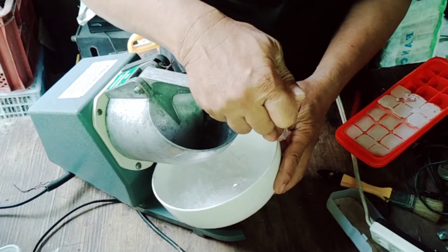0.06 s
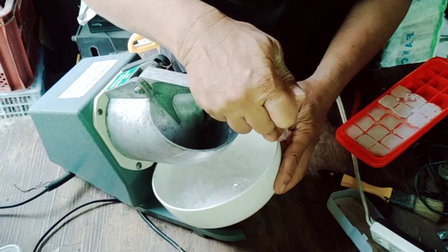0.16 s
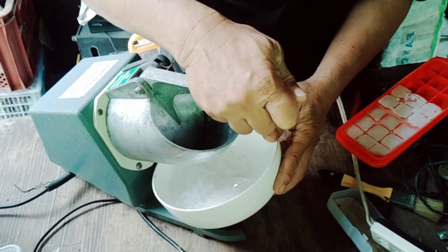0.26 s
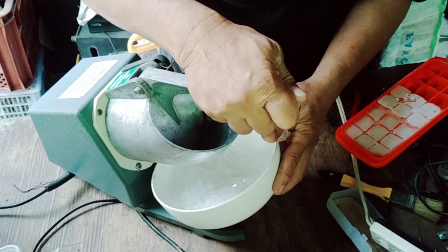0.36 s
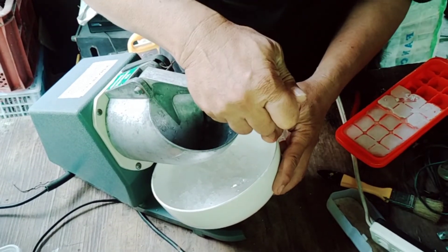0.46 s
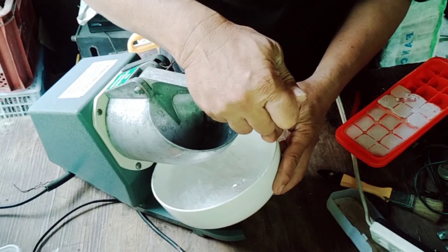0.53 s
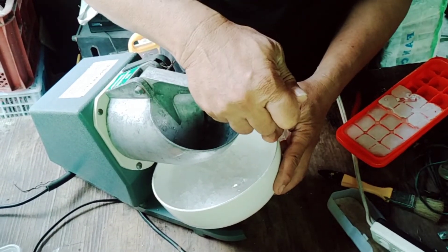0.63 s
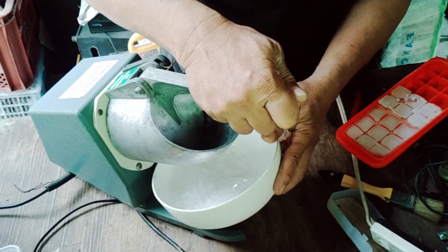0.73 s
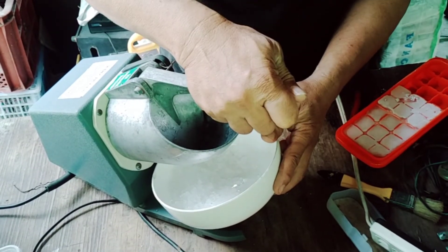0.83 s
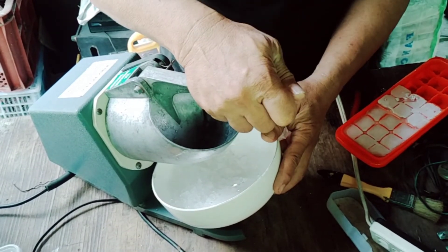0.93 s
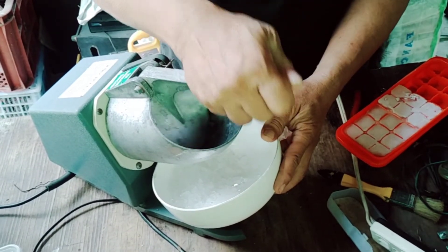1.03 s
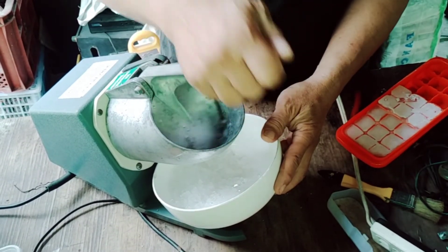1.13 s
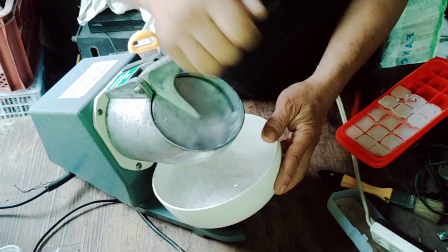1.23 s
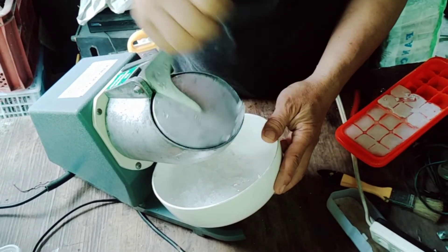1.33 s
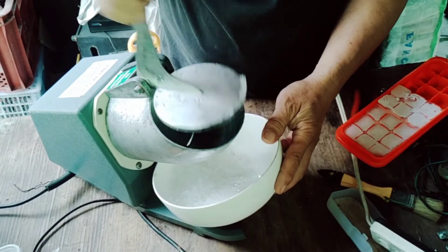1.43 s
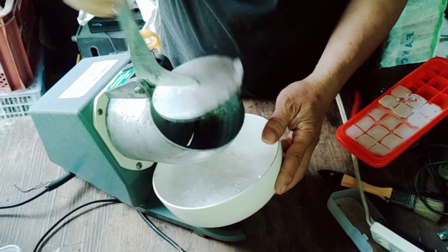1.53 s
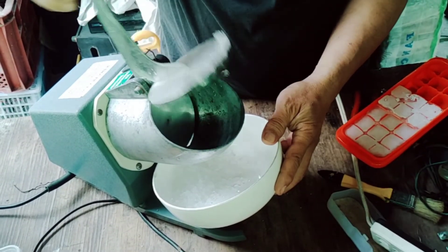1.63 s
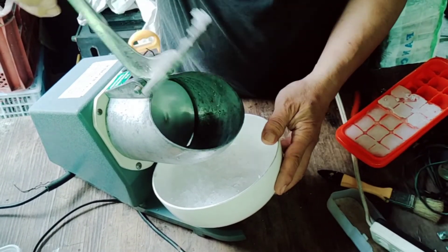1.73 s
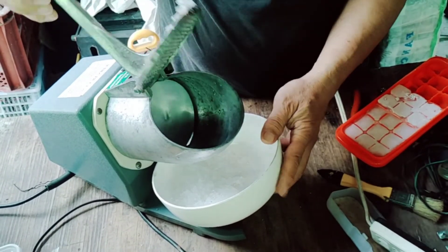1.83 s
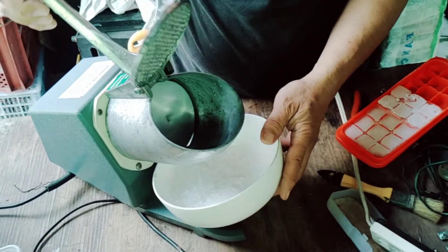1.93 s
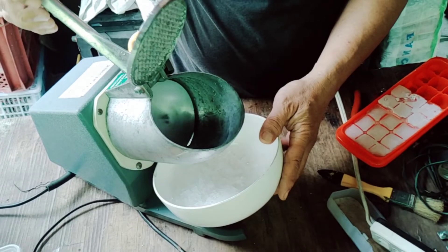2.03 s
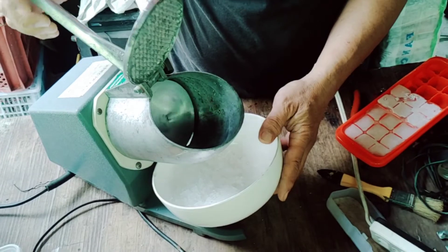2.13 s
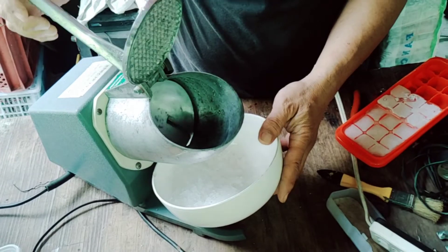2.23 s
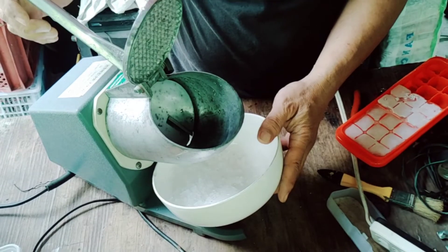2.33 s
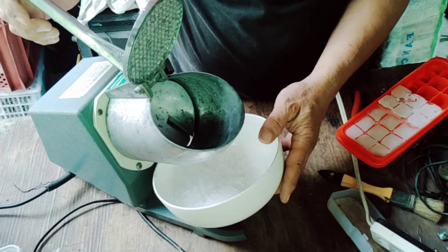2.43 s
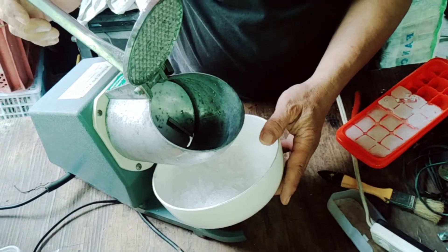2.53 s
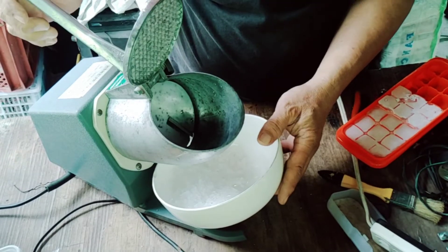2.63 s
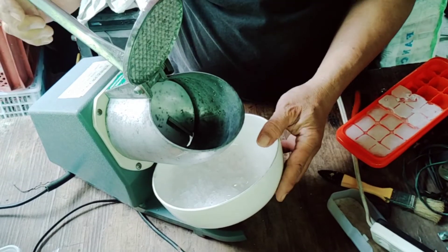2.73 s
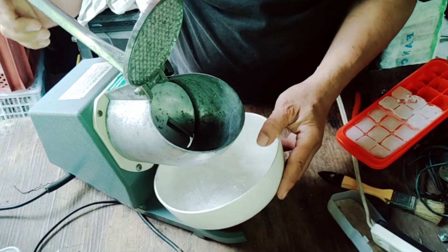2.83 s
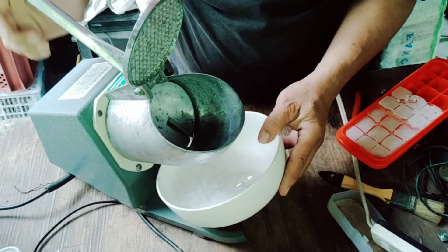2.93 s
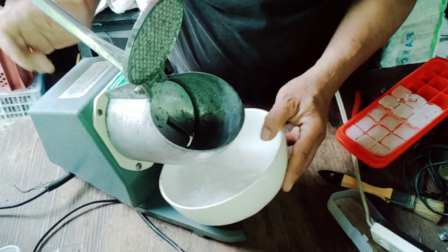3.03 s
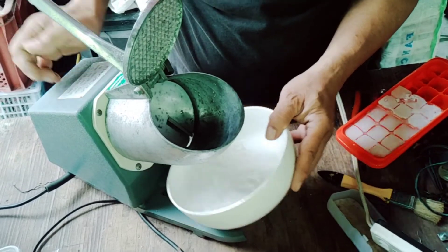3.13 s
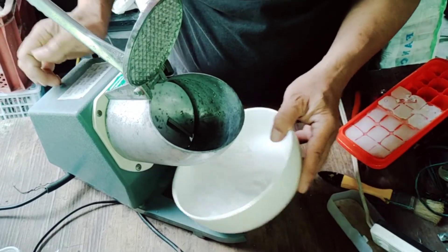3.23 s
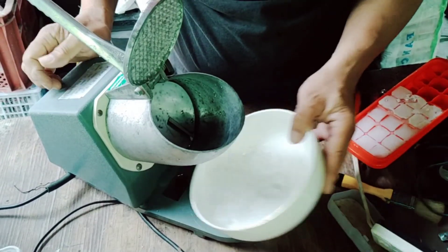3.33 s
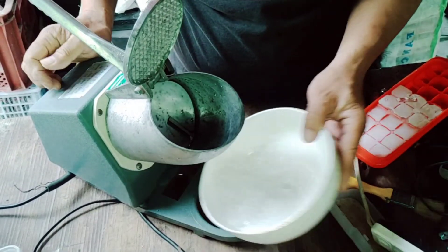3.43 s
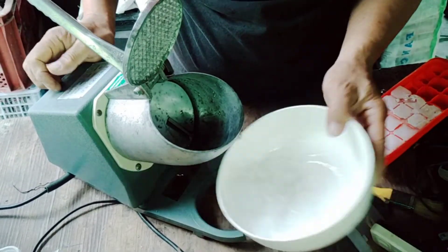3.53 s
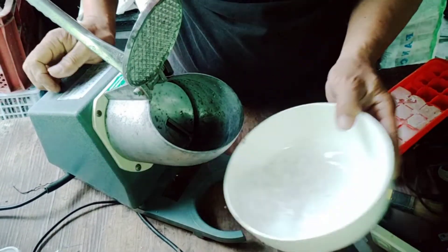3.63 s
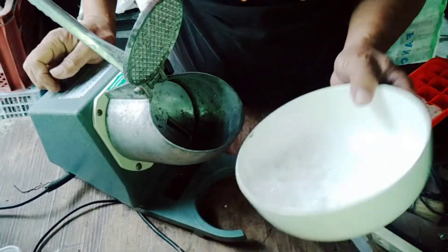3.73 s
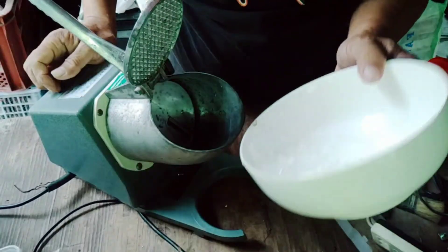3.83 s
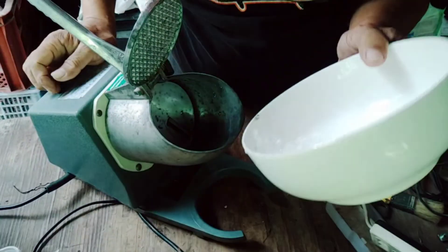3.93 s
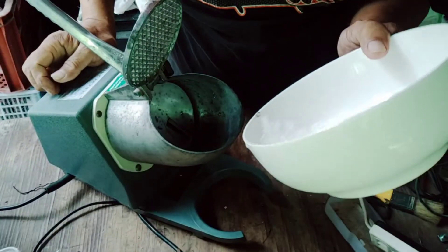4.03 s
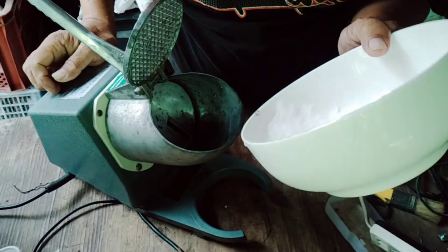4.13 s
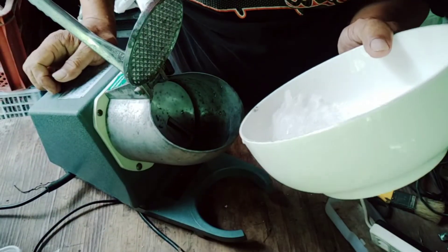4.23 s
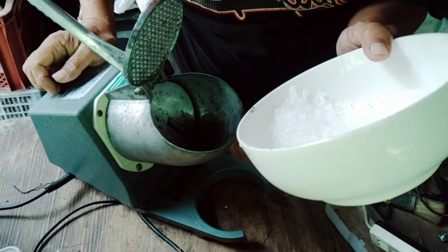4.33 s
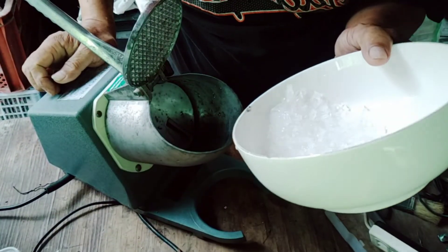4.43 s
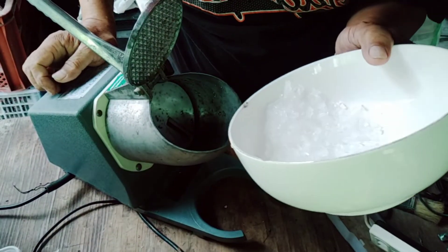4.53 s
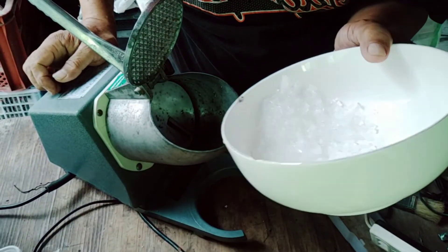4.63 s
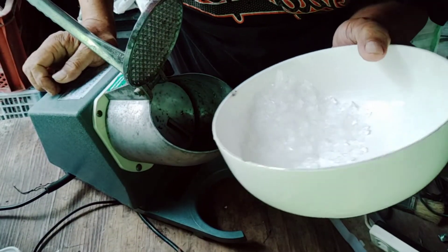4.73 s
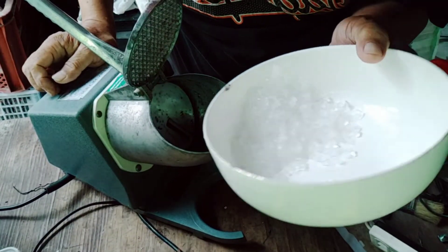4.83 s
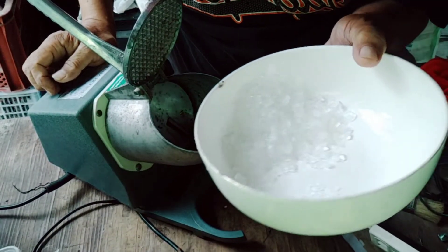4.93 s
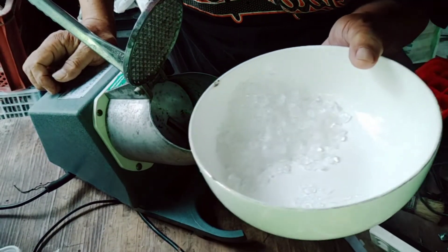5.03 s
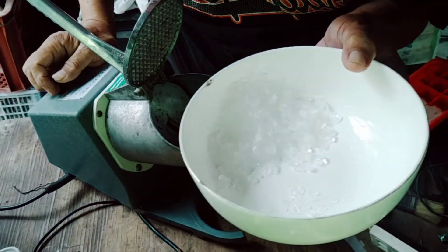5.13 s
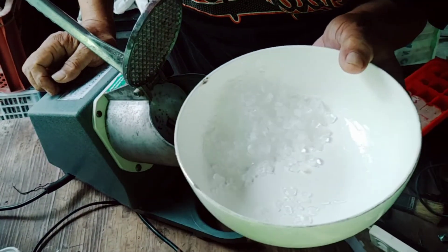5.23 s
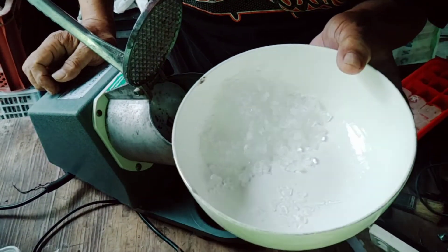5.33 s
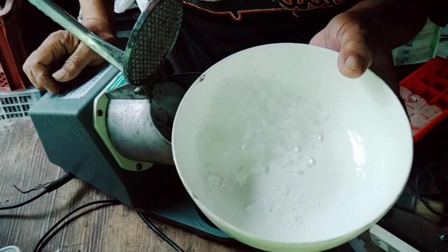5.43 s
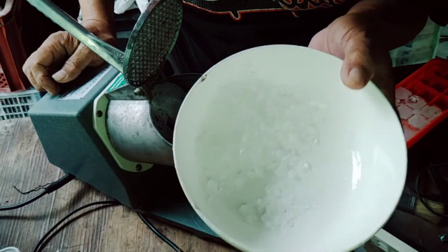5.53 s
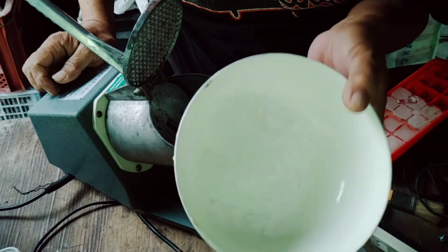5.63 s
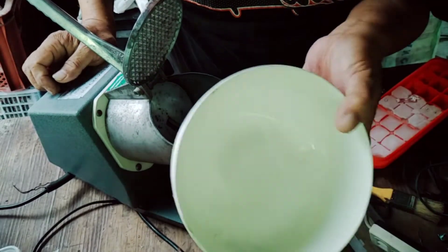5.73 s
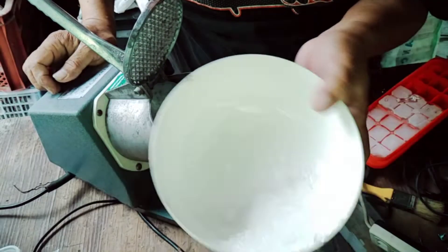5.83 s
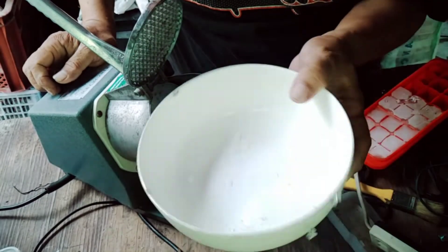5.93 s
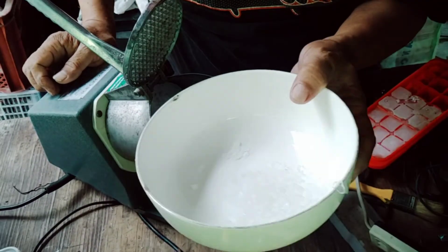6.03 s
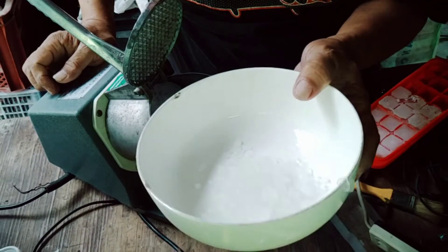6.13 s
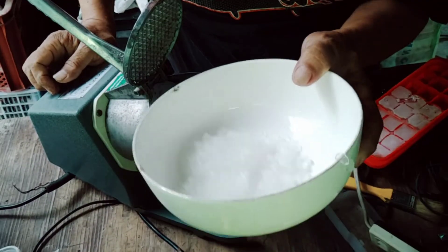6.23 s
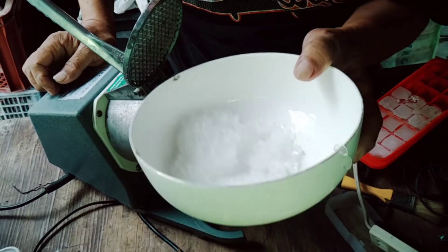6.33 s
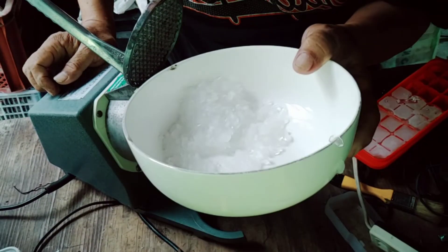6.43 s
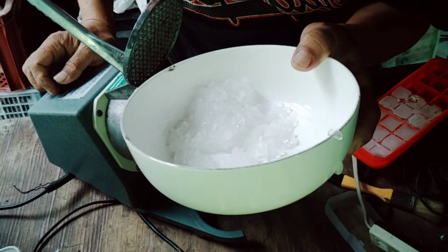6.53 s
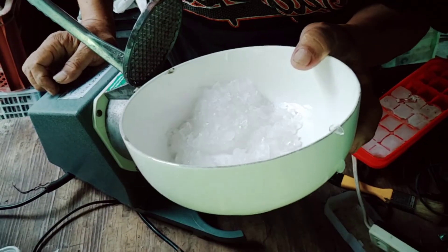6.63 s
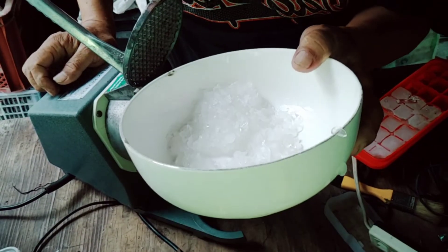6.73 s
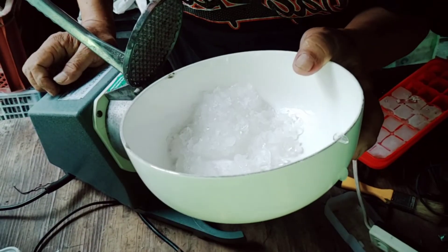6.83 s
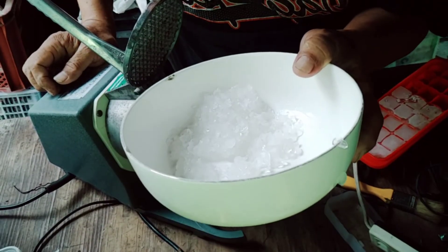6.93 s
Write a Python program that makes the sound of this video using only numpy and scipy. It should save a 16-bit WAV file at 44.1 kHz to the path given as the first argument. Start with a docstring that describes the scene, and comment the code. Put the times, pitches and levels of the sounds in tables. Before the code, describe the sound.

Harsh grinding of ice over a low mains hum fades and stops abruptly, followed by dull hand bumps, plastic knocks and a brief skitter of shaved ice.

```python
"""An open workroom: an electric ice shaver hums on the mains, bites the last of its ice and is switched off.
The hum is made of sines; bites are sprays of clicks that ring the metal chute, the ice lumps and the blade.
Hands knock the lever and a plastic bowl, heard as short rings and low swings.
Shaved ice slides in the bowl as clumped grains, and a wet finger squeaks on it as a rough scrape.
Under it all lie filtered noises: a distant rumble and a hiss that swells four times."""
import sys
import numpy as np
from scipy import signal
from scipy.fft import rfft, irfft
from scipy.io import wavfile

SR = 44100
rng = np.random.default_rng(int(sys.argv[2]) if len(sys.argv) > 2 else 0)


def file_out(sig):
    """Save sig as 16-bit WAV at sys.argv[1]."""
    # one column per channel
    cols = np.atleast_2d(sig).T
    # limit, then scale
    lim = np.clip(cols, -1, 1)
    pcm = np.round(lim * 32767).astype(np.int16)
    wavfile.write(sys.argv[1], SR, pcm)


N = 307377

# Tables. A "colour" is the shape of a noise spectrum; its level_db is relative, per Hz.
# strength of the hum, held down while the blade labours: time_s, level_db
HUM_STRENGTH = [(0, -37), (.09, -44.5), (.16, -28.5), (.27, -37), (.43, -34.5), (.52, -22.5), (.8, -23.5),
                (.88, -31), (.97, -25.5), (1.2, -27.5), (1.3, -25), (1.6, -27)]
# parts of the hum: multiple, level_db (rms at full strength, before flutter), swing_share
HUM_MULTIPLES = [(1, -43, 0.0), (2, -25.5, 0.84), (3, -38, 1), (4, -54, 0.098), (5, -56.5, 0.61)]
# colour of the motor casing: pitch_hz, level_db
CASING_COLOUR = [(60, -29), (110, -3), (170, -3.5), (240, 1), (350, -0.5), (560, -18.5), (1100, -13),
                 (3500, -48)]
# blade bites and, last, the switch: start_s, crack_db, chute_db, lump_db, lump_hz
BITES = [(0.0312, -22, -34, -28, 1355), (0.0976, -22, -23.5, -29, 2980), (0.1255, -21.5, -35, -11.5, 993),
         (0.136, -29, -22.5, -32, 826), (0.1778, -22.5, -27, -13.5, 1856),
         (0.2358, -23.5, -11.5, -10.5, 1907), (0.2618, -27, -18.5, -16.5, 986),
         (0.2814, -29, -41, -18, 1940), (0.325, -23, -24, -18.5, 2770), (0.346, -20.5, -22, -20.5, 2010),
         (0.3983, -32, -16.5, -19.5, 1700), (0.423, -36, -9, -16.5, 1880), (0.442, -22, -26, -28, 4800),
         (0.463, -31, -45, -33, 4660), (0.4735, -31, -26, -16.5, 1950), (0.501, -25, -34, -27, 1750),
         (0.52, -27.5, -51, -41, 1890), (0.5694, -30, -43.5, -26.5, 2800), (0.626, -27.5, -35, -29, 2970),
         (0.6734, -22.5, -23.5, -32, 1950), (0.688, -27, -40, -27, 1020), (0.7151, -24, -27, -32, 2260),
         (0.7465, -25, -26, -35.5, 1620), (0.7685, -25, -37, -38, 2300), (0.7947, -34.5, -38.5, -22, 1005),
         (0.853, -25, -30.5, -36.5, 2800), (0.8988, -23.5, -28, -33, 810), (0.952, -21.5, -24.5, -34, 910),
         (1.0102, -21, -33, -33.5, 880), (1.071, -22, -28, -34.5, 3100), (1.1304, -21.5, -30.5, -41, 3060),
         (1.162, -25.5, -48, -55, 1050), (1.1917, -29, -40.5, -43.5, 1330), (1.2358, -32, -75, -80, 830),
         (1.269, -22, -38, -42, 4560), (1.296, -23, -34.5, -42, 1100), (1.502, -23.5, -48, -34, 715)]
# colour of the cracking ice: pitch_hz, level_db
CRACK_COLOUR = [(880, -35), (1500, -3.5), (1930, -5), (2570, -11), (2960, -1), (3610, -4.5), (7410, -6),
                (8020, -10), (11800, -22.5), (15200, -16), (16300, -9)]
# resonances of the metal chute and casing: pitch_hz, width_hz, level_db
CHUTE_MODES = [(309, 83, 5.5), (489, 22, 3), (827, 87, -2), (1028, 96, 2), (1626, 42, -1.5), (1918, 34, 6),
               (2240, 60, -2), (2902, 82, 1.5), (4770, 190, -10), (6670, 240, -12), (7870, 26, -12)]
# ringing of the blade: pitch_hz, t60_s (time to fall 60 dB), level_db
BLADE_MODES = [(3036, .08, 0), (2918, .06, -2)]
# knocks of lever and bowl: start_s, peak_db (of the rings), clack_db, low_pass_hz
KNOCKS = [(2.588, -27, -52, 1770), (2.648, -28.5, -54.5, 1810), (2.714, -27.5, -56, 1820),
          (2.936, -29.5, -64, 720), (2.953, -32, -66, 400), (4.174, -25, -49.5, 1520),
          (4.187, -35, -65, 398), (6.247, -48, -49, 5000)]
# ringing of the plastic body: pitch_hz, level_db, t60_s
BODY_MODES = [(215, -1.5, 0.13), (279, 2, 0.14), (377, 10.5, 0.056), (463, 13.5, 0.024), (670, 0, 0.031),
              (848, 4.5, 0.03), (1030, -2, 0.022), (1205, -1, 0.059), (1570, -3.5, 0.026), (2310, 3, 0.029)]
# soft rub of the bowl on the bench: time_s, level_db
SCUFF = [(3.08, -75), (3.092, -50), (3.115, -56), (3.135, -69)]
# thin rings within the rub: pitch_hz, level_db (against the rub)
SCUFF_RINGS = [(5200, -19.5), (6700, -23), (8500, -18)]
# dull bumps of the hand: start_s, level_db, pitch_hz, t60_s
BUMPS = [(2.198, -32.5, 145, 0.072), (2.941, -29, 203, 0.1), (4.817, -34, 157, 0.15),
         (4.864, -36, 146, 0.2), (5.573, -23.5, 118, 0.036), (5.59, -28, 200, 0.042),
         (5.613, -20.5, 139, 0.032), (5.999, -36, 158, 0.13), (6.038, -40, 158, 0.19)]
# the ice slides when the bowl tips: peak_s, peak_db, rise_db_per_s, fall_db_per_s
SLIDES = [(5.53, -64, 452, 38), (5.81, -47, 162, 200), (5.841, -38.5, 289, 500), (5.872, -40.5, 400, 400),
          (6.05, -63, 50, 30), (6.34, -63, 88, 130), (6.5, -62.5, 74, 126)]
# colour of the sliding ice: pitch_hz, level_db
SLIDE_COLOUR = [(600, -6), (1500, -14.5), (2500, -12), (3050, 0.5), (3500, -6.5), (4200, -16), (5000, -8.5),
                (5700, -17), (7000, -8), (7800, -11), (8600, -5.5), (9600, -9.5), (11100, -14),
                (15300, -3.5)]
# ticks of loose ice and drips: start_s, tick_db, ring_hz, ring_db
TICKS = [(2.078, -62, 5900, -55), (3.439, -62, 9000, -65), (3.939, -53.5, 12000, -58),
         (5.699, -45.5, 8500, -64), (5.74, -50, 7000, -55), (5.757, -43, 6850, -43),
         (6.059, -57, 3095, -49), (6.247, -32, 2600, -36.5), (6.249, -70, 1400, -46),
         (6.309, -52, 4740, -60), (6.347, -47, 8400, -54), (6.436, -65, 2950, -44.5),
         (6.49, -50, 3020, -48)]
# wet finger squeak on the bowl: time_s, base_hz, level_db, hiss_db
SQUEAK = [(4.965, 5140, -90, -95), (4.982, 5100, -68, -76), (5.005, 4540, -58, -62),
          (5.035, 4360, -70, -61), (5.06, 4300, -78, -78)]
# colour of the swelling hiss: pitch_hz, level_db
PUFF_COLOUR = [(2000, 9), (4000, -1), (8600, 2), (10000, -2), (13000, -29)]
# colour of the steady room noise: pitch_hz, level_db
ROOM_COLOUR = [(25, -36), (60, -58), (110, -3.5), (160, -4.5), (220, -9), (400, -11.5), (600, -16),
               (1470, -23.5), (2520, -27), (3500, -36), (4600, -46), (7000, -45), (11500, -50),
               (15500, -46)]

# Motor and switch
HUM_HZ, FULL_HUM_DB, IDLE_RUMBLE_DB = 120.1, -25, -38
SWITCH_OFF_S = 1.508   # the current is cut
RUN_DOWN_DB_PER_S, COAST_DB_PER_S = 792, 151   # the hum stops fast; the disc coasts a little longer
# bites whose chute level passes JOLT_FROM_DB jolt the casing; JOLT_DB is against that level
JOLT_FROM_DB, JOLT_DB, JOLT_T60_S, JOLT_RISE_S = -22.5, -10, 0.09, 0.004

# Steady rubbing while ice is left, then thinning: (steady dB, ice runs out s, fall dB per s)
CRUNCH, CHUTE_RUB, WHINE = (-34, 0.52, 44), (-33, 0.31, 44), (-47, 0.71, 34)
# steady hiss and faint ring of the running motor after the ice thins: (hiss, chute ring)
MOTOR_FLOOR_DB = (-67, -61.5)
PRESS_S, PRESS_DB_PER_S = 0.18, 52   # the rubbing grows until the pusher bears down
LOW_RING_ENDS_S, LOW_RING_LOSS_DB = .85, 12   # two lowest chute modes weaken as the pusher touches down
BITE_T60_S, BITE_GAP_SHARE = 0.045, 0.73   # a bite lasts longer when the next one is further off
THICK_RISE_S, THIN_RISE_S = .0025, 0.0006   # bites build more slowly while the ice is thick
SNAP_DB = -4   # the first snap of a lump, against its level in the table
BLADE_KICK_DB, BLADE_KICK_T60_S = -33, 0.094   # every crack kicks the blade; dB against the crack
PUSHER_HZ, PUSHER_T60_S = 553, .12
PUSHER_RING = (-43.5, 0.836, 180)   # columns as for CRUNCH
PUSHER_JOLT_DB, PUSHER_JOLT_T60_S = -19, 0.25   # heavy bites kick it; dB against their chute level

# Hands, bowl and ice
RATTLE_DB, RATTLE_T60_S = -7, .012   # the rattle after a contact, against its first firm touch
THUD_DB, THUD_T60_S = 4.5, 0.07   # a woody thud under each clack, against the clack
# the bench booms late under each knock; dB against its peak
BENCH_DB, BENCH_T60_S, BENCH_RISE_S, BENCH_HZ = -3, 0.1, 0.012, (233, 332.6)
SLIDE_ENDS_S, SLIDE_STOP_DB_PER_S = (5.885, 6.6), 380   # the ice meets the wall of the bowl
TICK_RING_T60_S = 0.017

# Background and microphone
ROOM_DB, RUMBLE_DB, RUMBLE_WAVER_DB = -52, -54.5, -2.5
PUFF_FIRST_S, PUFF_EVERY_S, PUFF_DB, PUFF_HALF_S = 1.75, .953, -69.5, .056
PORT_HZ, PORT_WIDTH_HZ, PORT_SHARE = 8430, 1020, 1   # resonance of the microphone port
CUTOFF_HZ = 15700


def motor():
    """Magnetic hum at twice the mains and its multiples, over the rumble of the casing."""
    swing_db = in_time(HUM_STRENGTH)[0] - FULL_HUM_DB
    running = amp(thinning(0, 0, 0, off_db_per_s=RUN_DOWN_DB_PER_S))
    jolts = sum(dying(s, chute_db + JOLT_DB, JOLT_T60_S, JOLT_RISE_S)
                for s, _, chute_db, _, _ in BITES if chute_db > JOLT_FROM_DB)
    rumble = amp(IDLE_RUMBLE_DB) + jolts
    # heavy biting shakes the hum unsteady: load goes from 0 to 1 over 8 dB
    load = np.clip((20 * np.log10(rumble) - IDLE_RUMBLE_DB) / 8, 0, 1)
    wobble_hz = (.4 + 1.5 * load) * drift(12)
    phase = 2 * np.pi * np.cumsum(HUM_HZ + wobble_hz) / SR
    flutters_db = np.linspace(1.2, 3.0, len(HUM_MULTIPLES))
    hum = 0
    for (multiple, db, share), flutter_db in zip(HUM_MULTIPLES, flutters_db):
        level_db = db + share * swing_db + (flutter_db + 4 * load) * drift(12)
        hum = hum + amp(level_db) * np.sin(multiple * phase)
    # the root of two turns rms levels into sine heights
    return running * (np.sqrt(2) * hum + rumble * coloured(rng.standard_normal(N), CASING_COLOUR))


def shaving():
    """Each bite is a spray of splinters that dies fast, shakes the chute and rings the lump being cut."""
    splinters = patchy(grit(6000 * amp(2.5 * drift(150)), spread_db=2.0), patchy_db=3.0)
    force = grit(4000, spread_db=3.5)
    dull = coloured(splinters, CRACK_COLOUR, tilt_db=-5.5)
    bright = coloured(splinters, CRACK_COLOUR, tilt_db=13.5)

    # steady sound between the bites
    pressing = amp(-PRESS_DB_PER_S * np.maximum(PRESS_S - np.arange(N) / SR, 0))
    crunch_level = amp(thinning(*CRUNCH, MOTOR_FLOOR_DB[0]) + 1.2 * drift(26))
    crack = pressing * crunch_level * (0.12 * dull + 1.72 * bright)
    shake = pressing * amp(thinning(*CHUTE_RUB, MOTOR_FLOOR_DB[1]) + 4.1 * drift(30))

    gaps_s = np.diff([row[0] for row in BITES])
    t60s = BITE_T60_S + BITE_GAP_SHARE * np.append(np.minimum(gaps_s, .06), 0)
    chips_hz = np.exp(rng.uniform(np.log(1200), np.log(9000), (len(BITES), 8)))
    for (s, crack_db, chute_db, lump_db, lump_hz), t60, chip_hz in zip(BITES, t60s, chips_hz):
        # a bite into a big lump sounds duller
        bright_share = np.clip(0.45 + (crack_db - lump_db) / 30, 0, 1)
        rise_s = THICK_RISE_S if s < CRUNCH[1] else THIN_RISE_S
        crack += dying(s, crack_db, t60, rise_s) * (bright_share * bright + (1 - bright_share) * dull)
        shake += dying(s, chute_db, .5 * t60, rise_s)

        near = slice(round(s * SR), round(s * SR) + SR // 5)
        grinding = (dying(s, lump_db, 0.86 * t60, rise_s) * force)[near]
        crack[near] += 0.08 * ring(grinding, lump_hz, 0.033)
        snap = np.arange(SR // 5) == 0
        crack[near] += amp(lump_db + SNAP_DB) * ring(snap, lump_hz, 0.029)
        # the chips that break off ring briefly at pitches of their own
        chipping = (dying(s, crack_db, t60, 0.0027) * force)[near]
        chips = sum(ring(chipping, hz, 0.039) for hz in chip_hz)
        crack[near] += 0.029 * (1 - bright_share) * chips
    return crack + chute(shake * force) + blade(force)


def chute(force):
    """Parallel resonances of the metal chute; white force of rms 1 comes out near rms 1."""
    # a narrow resonance rings longer: t60 is 2.77 over its width
    modes = [(hz, 2.77 / width, amp(db) * np.sqrt(width)) for hz, width, db in CHUTE_MODES]
    scale = np.sqrt(sum(gain * gain for _, _, gain in modes))
    damped = force * amp(-LOW_RING_LOSS_DB * (np.arange(N) / SR > LOW_RING_ENDS_S))
    out = 0
    for k, (hz, t60, gain) in enumerate(modes):
        level = gain / scale * np.sqrt(4 * np.log(1000) / (t60 * SR))
        # every second mode is turned upside down
        out = out + level * ring(damped if k < 2 else force, hz, t60) * (-1) ** k
    return out


def blade(force):
    """The blade whines at two pitches, rubbed by the ice and kicked by every crack."""
    kicks = sum(dying(row[0], row[1] + BLADE_KICK_DB, BLADE_KICK_T60_S, 0.0048) for row in BITES[:-1])
    rubbed = amp(thinning(*WHINE) + 3.5 * drift(22))
    return (kicks + rubbed) * sum(amp(db) * rms_one(ring(force, hz, t60)) for hz, t60, db in BLADE_MODES)


def pusher():
    """The arm that presses the ice hums at one pitch while it shakes."""
    kicks = sum(dying(s, chute_db + PUSHER_JOLT_DB, PUSHER_JOLT_T60_S, 0.0019)
                for s, _, chute_db, _, _ in BITES if chute_db > JOLT_FROM_DB)
    tone = rms_one(ring(rng.standard_normal(N), PUSHER_HZ, PUSHER_T60_S))
    return (amp(thinning(*PUSHER_RING)) + kicks) * tone


def knocks():
    """A short soft rattle of contacts rings the plastic body; clack, thud and bench boom join in."""
    t = np.arange(N) / SR
    out = np.zeros(N)
    clack = band(rng.standard_normal(N), 420, 5700)
    thud = band(band(rng.standard_normal(N), 580, 1940), 580, 1940)
    chances_db = rng.normal(0, 2.0, (len(KNOCKS), len(BODY_MODES)))   # no two knocks ring alike
    rattle_fade = amp(-60 * np.arange(SR // 4) / SR / RATTLE_T60_S)
    rattles = rng.standard_normal((len(KNOCKS), SR // 4)) * rattle_fade
    contacts = amp(RATTLE_DB) * rattles + (np.arange(SR // 4) == 0)
    for (s, db, clack_db, low_pass_hz), chance_db, contact in zip(KNOCKS, chances_db, contacts):
        rings = sum(amp(mode_db + extra_db) * ring(contact, hz, t60)
                    for (hz, mode_db, t60), extra_db in zip(BODY_MODES, chance_db))
        rings = signal.lfilter(*signal.butter(2, low_pass_hz, fs=SR), rings)
        rings = signal.lfilter(*signal.butter(2, 150, "high", fs=SR), rings)
        at = round(s * SR)
        out[at:at + len(rings)] += amp(db) * rings / np.abs(rings).max()
        out += dying(s, clack_db, 0.08, 0.00063) * clack
        out += dying(s, clack_db + THUD_DB, THUD_T60_S, 0.0033) * thud
        boom = sum(np.sin(2 * np.pi * hz * (t - s)) for hz in BENCH_HZ)
        out += dying(s, db + BENCH_DB, BENCH_T60_S, BENCH_RISE_S) * boom
    return out


def scuff():
    """The bowl rubs softly on the bench: a band of noise with thin rings in it."""
    rub = rng.standard_normal(N)
    thin = sum(amp(db) * rms_one(ring(rub, hz, .012)) for hz, db in SCUFF_RINGS)
    return amp(in_time(SCUFF)[0]) * (thin + band(band(rub, 700, 2700), 700, 2700))


def bumps():
    """Each dull bump of the hand is a short, low, dying sine."""
    t = np.arange(N) / SR
    return sum(dying(s, db, t60, 0.0027) * np.sin(2 * np.pi * hz * (t - s)) for s, db, hz, t60 in BUMPS)


def sliding_ice():
    """Grains of ice skitter over the plastic in clumps; single pieces tick."""
    t = np.arange(N) / SR
    level = 0
    for s, peak_db, rise, fall in SLIDES:
        end_s = min(e for e in SLIDE_ENDS_S if e > s)
        level_db = peak_db - rise * np.maximum(s - t, 0) - fall * np.maximum(t - s, 0)
        level = level + amp(level_db - SLIDE_STOP_DB_PER_S * np.maximum(t - end_s, 0))
    grains = grit(3500 * amp(3.0 * drift(120)), spread_db=2.5)
    ticks = sum(dying(s, db, 0.036, 0.00047) for s, db, _, _ in TICKS)
    pings = sum(dying(s, db, TICK_RING_T60_S, 0.0003) * np.sin(2 * np.pi * hz * t)
                for s, _, hz, db in TICKS)
    tick_noise = coloured(rng.standard_normal(N), SLIDE_COLOUR)
    return pings + level * coloured(grains, SLIDE_COLOUR) + ticks * tick_noise


def squeak():
    """Rough scrape: a fixed band of the bowl, a blurred falling tone above and one below, plus hiss."""
    base_hz, db, hiss_db = in_time(SQUEAK)
    phase = 2 * np.pi * np.cumsum(base_hz * (1 + .035 * drift(600))) / SR
    rub = band(band(rng.standard_normal(N), 4500, 5250), 4500, 5250)
    above = amp(2.5) * drift(450) * np.sin(2 * phase)   # twice the base pitch
    below = amp(-3) * drift(150) * np.sin(phase / 2)   # half the base pitch
    scrape = amp(db + 1.4 * drift(300)) * (rub + above + below)
    return scrape + amp(hiss_db) * band(rng.standard_normal(N), 2900, 12500)


def room():
    """Steady broad noise, a lumpy low rumble from afar and a faint hiss that swells four times."""
    t = np.arange(N) / SR
    swell = sum(amp(PUFF_DB) * np.exp(-((t - PUFF_FIRST_S - k * PUFF_EVERY_S) / PUFF_HALF_S) ** 4)
                for k in range(4))
    steady = amp(ROOM_DB + .5 * drift(3)) * coloured(rng.standard_normal(N), ROOM_COLOUR)
    low = amp(RUMBLE_DB + RUMBLE_WAVER_DB * drift(4.1)) * band(rng.standard_normal(N), 95.0, 163.0)
    return steady + low + swell * coloured(rng.standard_normal(N), PUFF_COLOUR)


def amp(db):
    """Gain of a level in dB."""
    return 10 ** (np.asarray(db) / 20)


def rms_one(x):
    """Scales a sound to rms 1."""
    return x / np.sqrt(np.mean(x ** 2) + 1e-20)


def in_time(rows, outside=-120):
    """Draws straight lines between table rows: each column becomes one value a sample."""
    s, *columns = np.transpose(rows)
    return [np.interp(np.arange(N) / SR, s, c, left=outside, right=outside) for c in columns]


def thinning(steady_db, ends_s, fall_db_per_s, floor_db=-120, off_db_per_s=COAST_DB_PER_S):
    """Level in dB: steady, then falling to a floor; dying once the current is cut."""
    t = np.arange(N) / SR
    level_db = np.maximum(steady_db - fall_db_per_s * np.maximum(t - ends_s, 0), floor_db)
    return level_db - off_db_per_s * np.maximum(t - SWITCH_OFF_S, 0)


def dying(s, db, t60, rise_s):
    """Envelope that rises quickly from time s and dies away."""
    t = np.maximum(np.arange(N) / SR - s, 0)
    return amp(db - 60 * t / max(t60, .005)) * (1 - np.exp(-t / rise_s))


def drift(rate):
    """Slow random wander with spread 1; a higher rate in Hz wanders faster."""
    r = np.exp(-2 * np.pi * rate / SR)
    wander = signal.lfilter([1], [1, -2 * r, r * r], rng.standard_normal(N + SR))
    return rms_one(wander[SR:])   # the first second lets the filter settle


def ring(x, hz, t60):
    """Resonance: a unit click sets a sine of starting height 1 ringing."""
    r, w = 10 ** (-3 / (t60 * SR)), 2 * np.pi * hz / SR
    return signal.lfilter([0, np.sin(w)], [1, -2 * r * np.cos(w), r * r], x + 1e-18)


def grit(per_s, spread_db):
    """Dense clicks of uneven size, scattered by chance; rms 1."""
    sizes = amp(spread_db * np.minimum(rng.exponential(1, N), 5)) * rng.choice([-1, 1], N)
    return rms_one(sizes * (rng.random(N) < per_s / SR))


def coloured(x, spectrum, tilt_db=0):
    """Filters x to a spectrum, tilted in dB per octave; white input of rms 1 stays near rms 1."""
    hz = np.maximum(np.arange(N // 2 + 1) * SR / N, 10)
    at_hz, db = np.transpose(spectrum)
    shape_db = np.interp(np.log(hz), np.log(at_hz), db, left=-90)
    gain = amp(shape_db + tilt_db * np.log2(hz / 6000))
    return irfft(rfft(x) * rms_one(gain), N)


def band(x, low_hz, high_hz):
    """Keeps the pitches between two limits; rms 1."""
    return rms_one(signal.sosfilt(signal.butter(2, [low_hz, high_hz], "band", fs=SR, output="sos"), x))


def patchy(x, patchy_db):
    """Third-octave bands each flicker on their own, so the colour keeps shifting; rms 1."""
    edges_hz = 800 * 2 ** (np.arange(14) / 3)
    out = 0
    for k, (low, high) in enumerate(zip(edges_hz, edges_hz[1:])):
        flicker = amp(patchy_db * drift(41))
        out = out + flicker * np.sqrt(low) * band(x, low, high) * (-1) ** k
    return rms_one(out)


def scene():
    """All sources added together at one microphone."""
    machine = motor() + shaving() + pusher()
    hands_and_bowl = knocks() + scuff() + bumps() + sliding_ice() + squeak()
    return (machine + hands_and_bowl + room())[None]


def record(dry):
    """The port lifts one treble band, the deep bass rolls off and the top is cut steeply."""
    port = signal.lfilter(*signal.iirpeak(PORT_HZ, PORT_HZ / PORT_WIDTH_HZ, fs=SR), dry)
    lifted = dry + PORT_SHARE * port
    lifted = signal.sosfilt(signal.butter(3, 62, "high", fs=SR, output="sos"), lifted)
    return signal.sosfilt(signal.cheby1(14, .5, CUTOFF_HZ, fs=SR, output="sos"), lifted)


dry = scene()
out = record(dry)
file_out(out)
```